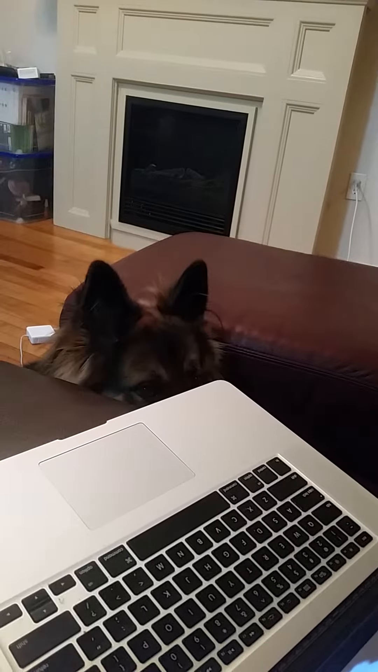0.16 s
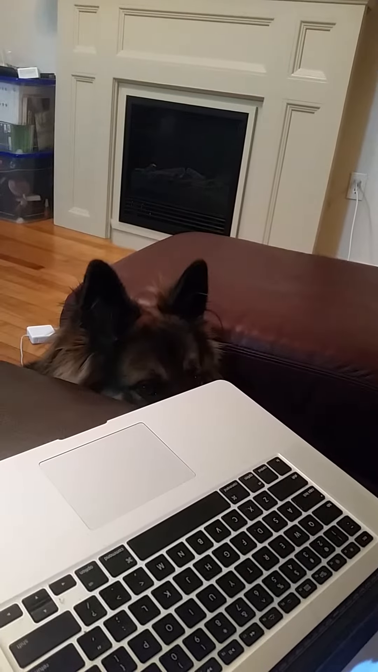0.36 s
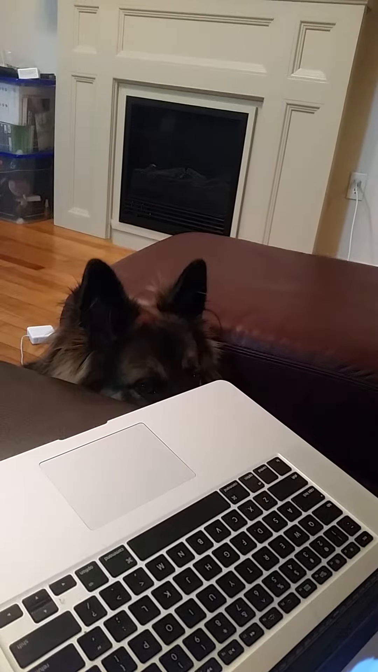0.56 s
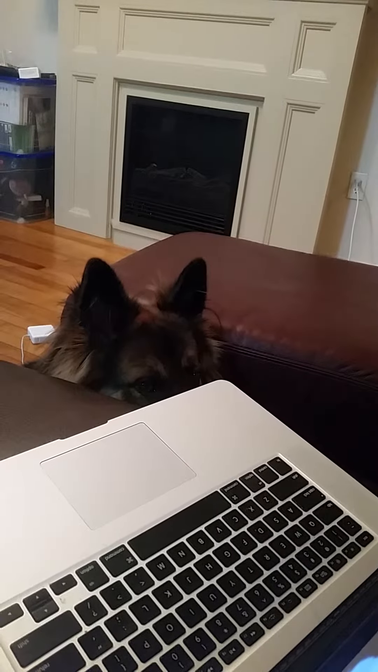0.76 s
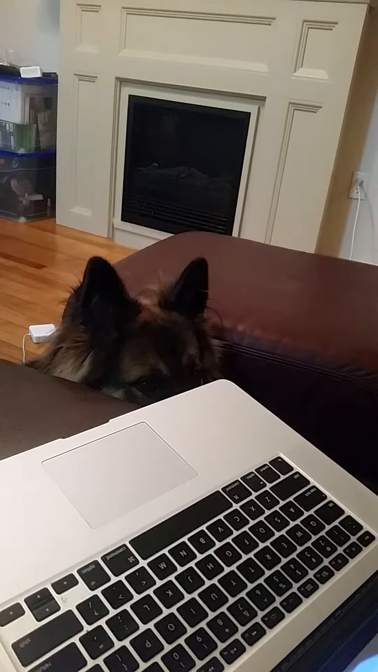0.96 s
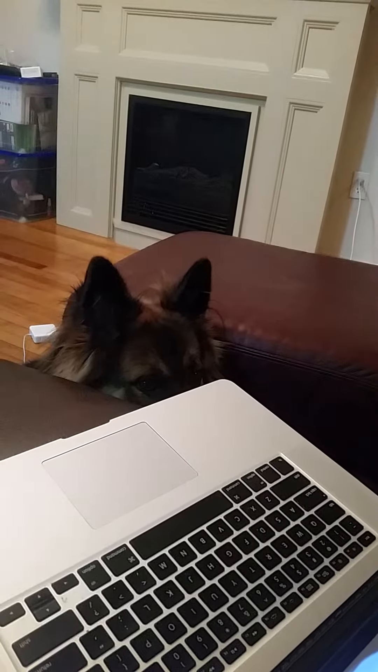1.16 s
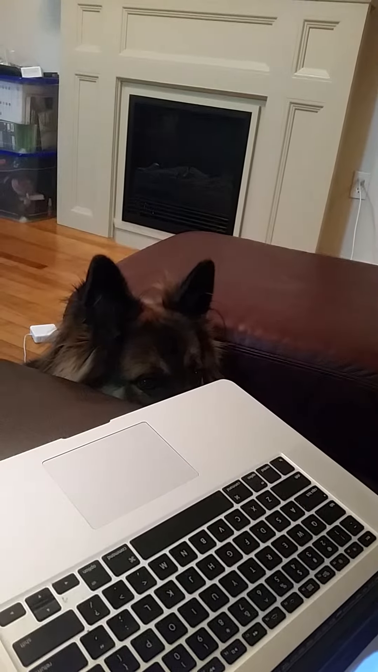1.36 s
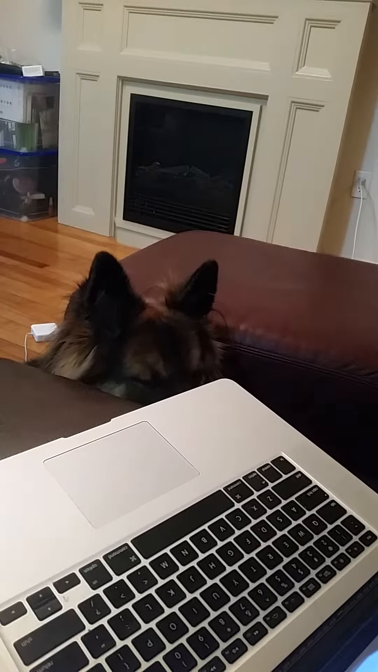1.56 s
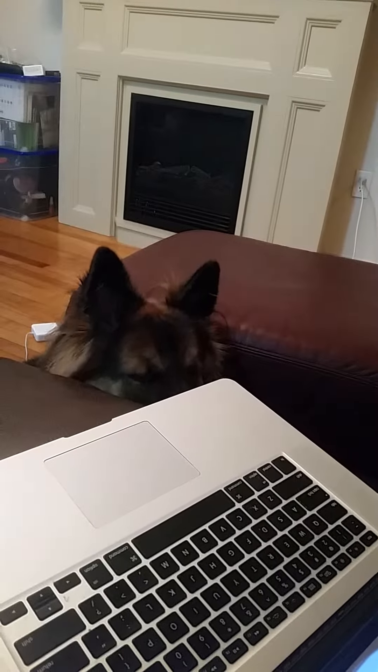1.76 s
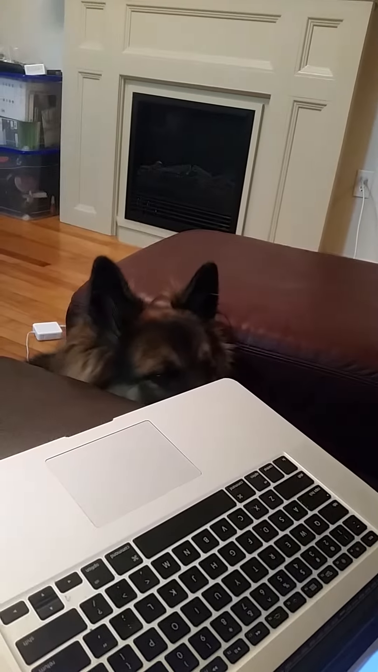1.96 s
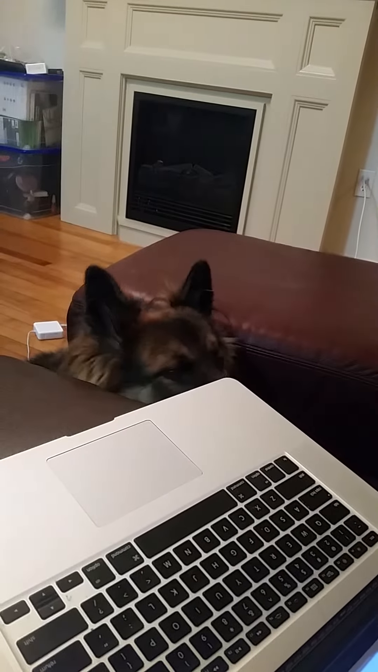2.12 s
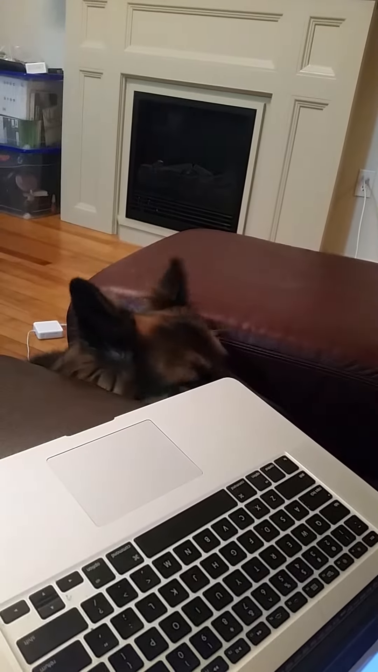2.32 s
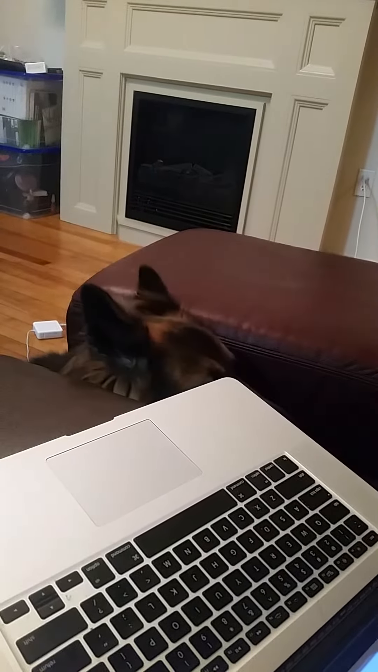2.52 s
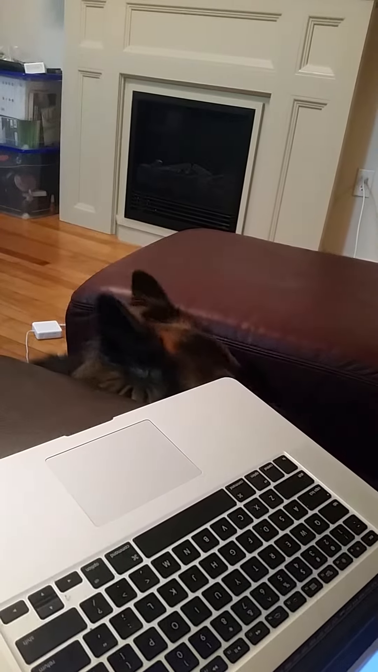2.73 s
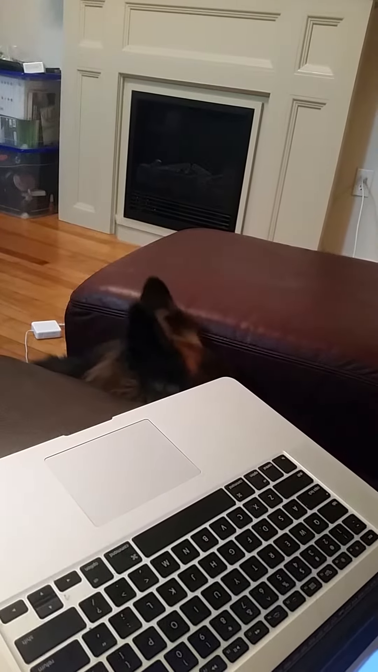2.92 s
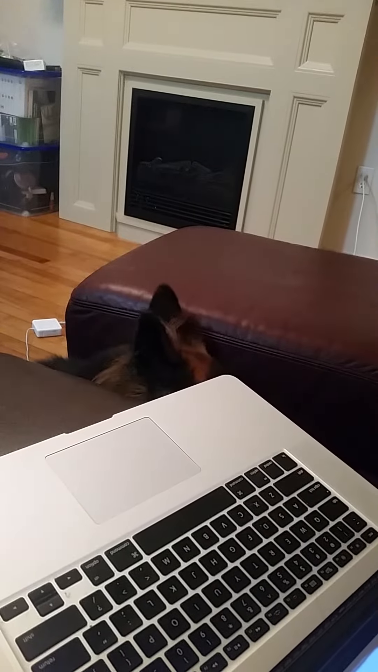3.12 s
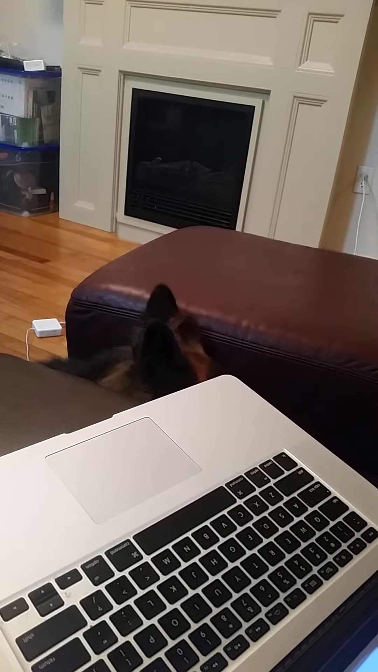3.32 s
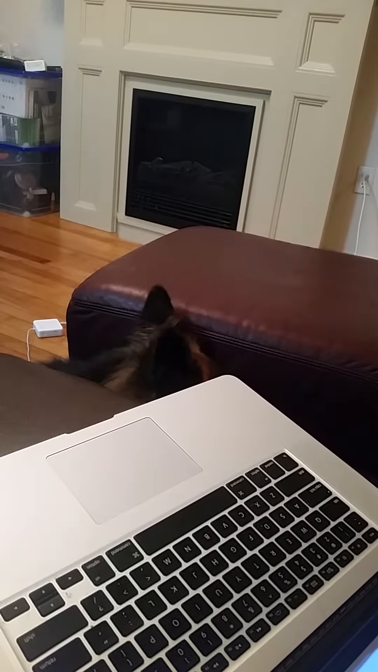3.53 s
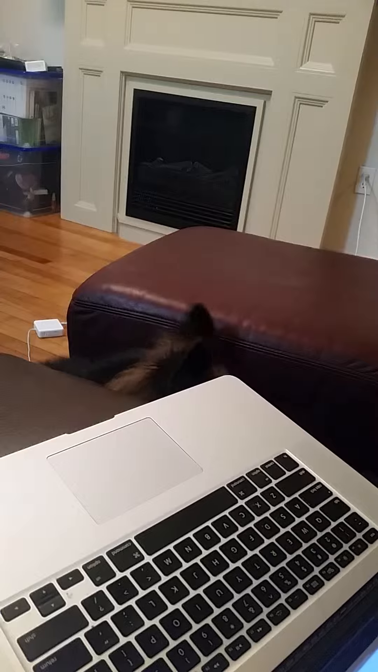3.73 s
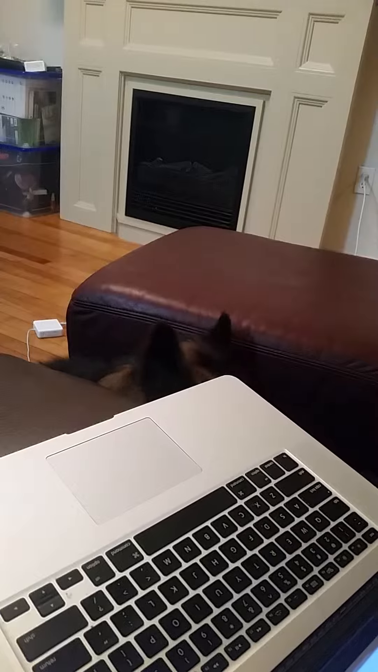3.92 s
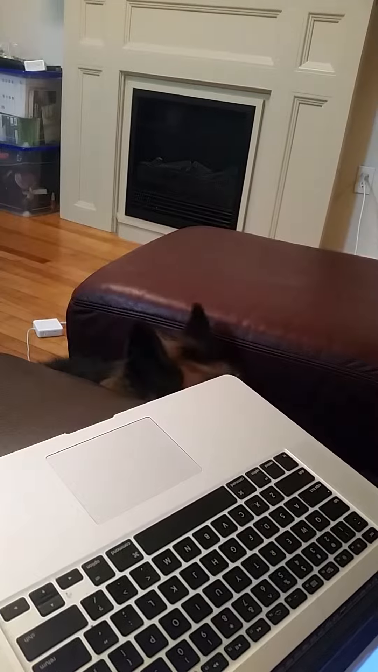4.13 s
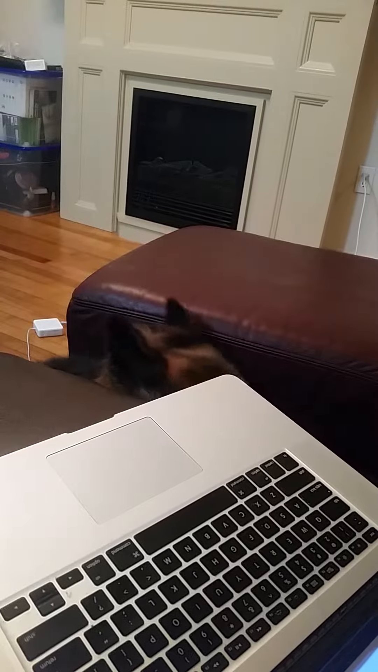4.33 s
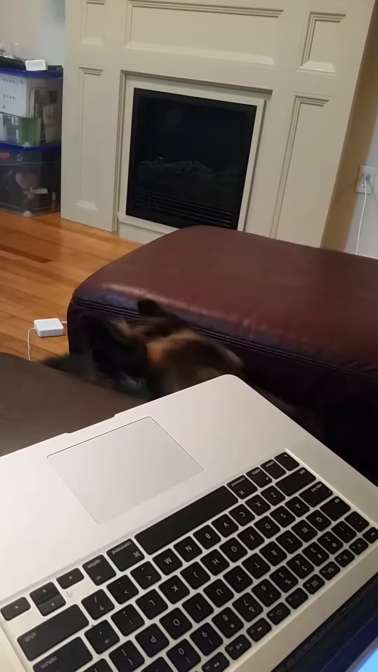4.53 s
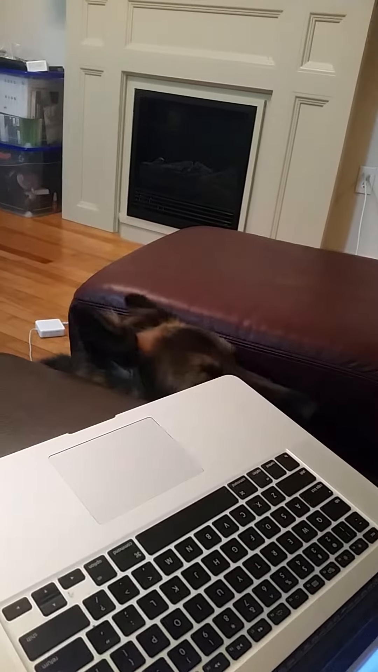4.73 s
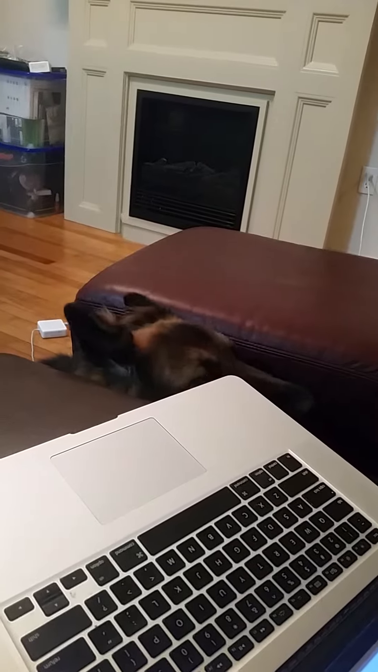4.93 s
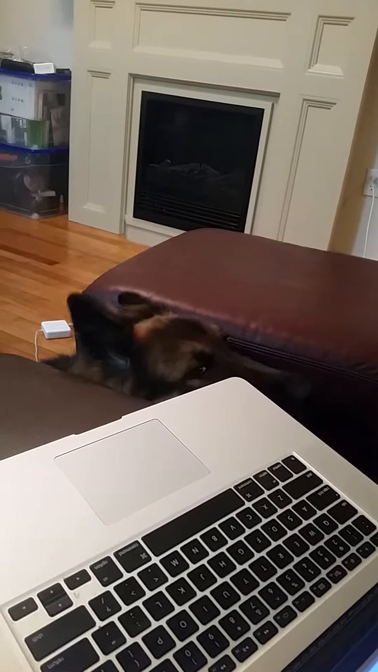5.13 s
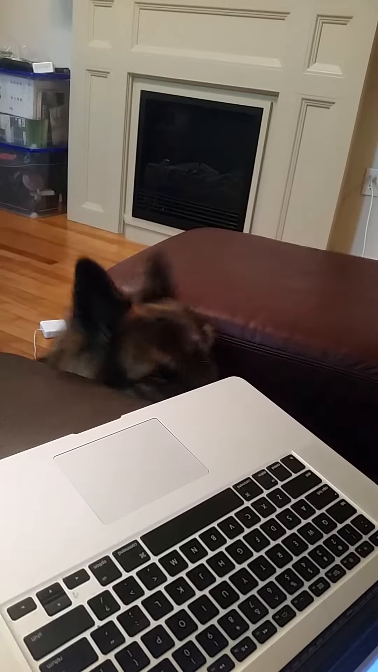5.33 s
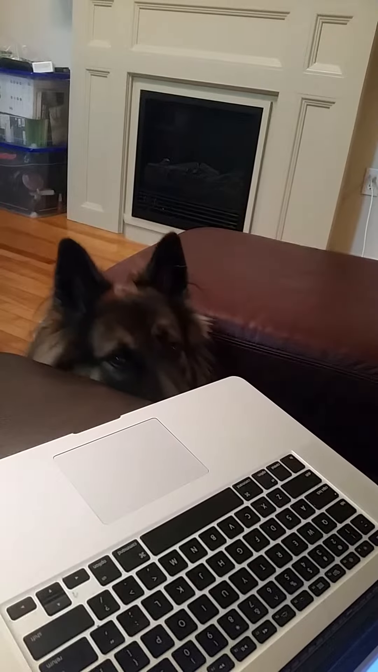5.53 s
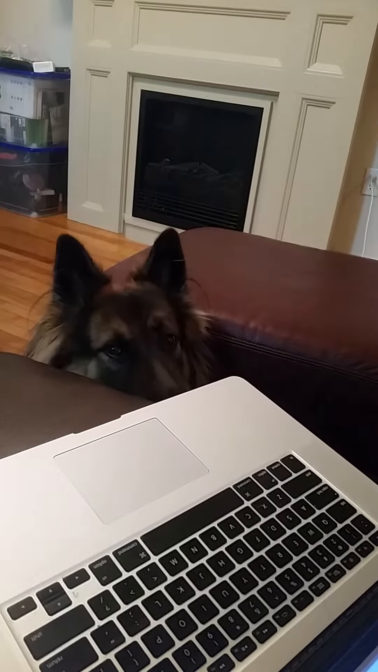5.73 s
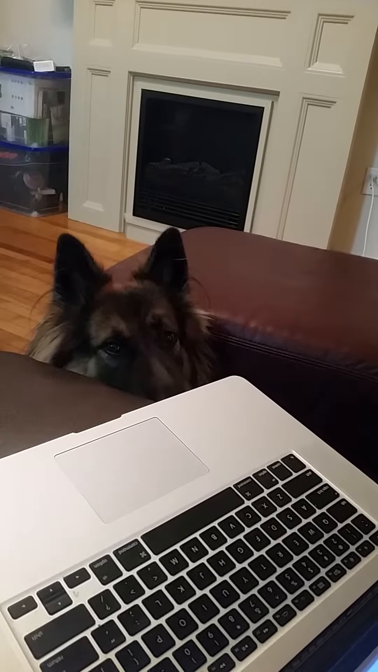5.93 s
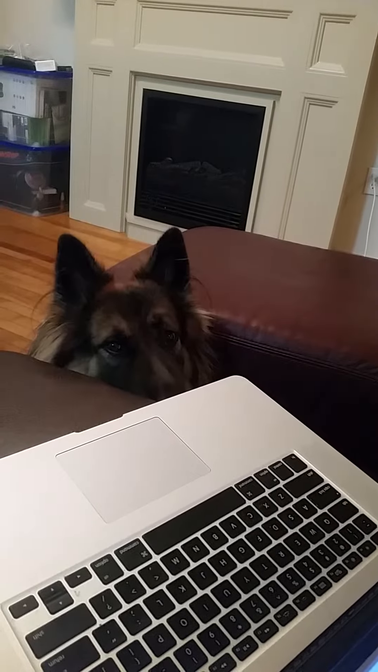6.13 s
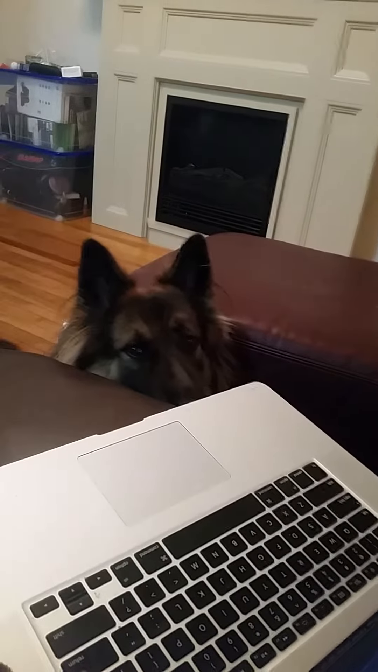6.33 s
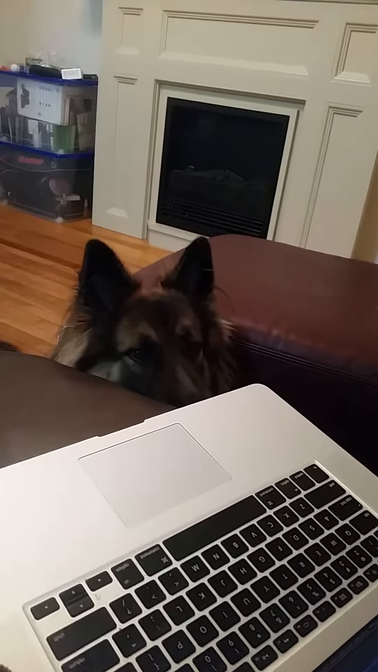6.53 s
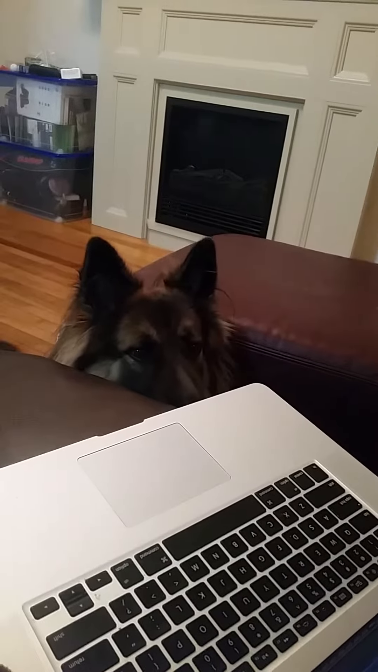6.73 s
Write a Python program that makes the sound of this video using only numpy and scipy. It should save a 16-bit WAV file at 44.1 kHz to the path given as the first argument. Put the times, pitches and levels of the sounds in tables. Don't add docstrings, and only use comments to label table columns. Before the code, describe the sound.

In a quiet furnished room, a large dog gives faint low moans and a thin nasal whine, then a loud howl that climbs quickly, holds, breaks and falls to a croak. A second, longer howl leaps up and sinks into a growl. Short soft whines follow. A hand-held microphone picks up thuds and ticks over faint room tone and hum; the dog sits to the right.

```python
import sys
import numpy as np
from scipy import signal
from scipy.fft import rfft, irfft, next_fast_len
from scipy.io import wavfile
from scipy.ndimage import uniform_filter1d, minimum_filter1d, map_coordinates

SR = 44100
rng = np.random.default_rng(int(sys.argv[2]) if len(sys.argv) > 2 else 0)


def wav_record(signal):
    frames = np.transpose(np.atleast_2d(signal))
    bounded = np.clip(frames, -1, 1)
    quanta = np.round(bounded * 32767).astype(np.int16)
    wavfile.write(sys.argv[1], SR, quanta)


def linear_from_db(decibels):
    return 10 ** (np.asarray(decibels, float) / 20)


N = 298468
T = np.arange(N) / SR
SLACK_HZ = 388.6

# (time [s], pitch [Hz], level [dB])
HOWL_1 = [
    [(1.56, 200, -51), (1.585, 211.1, -32.5), (1.645, 248.6, -45.5), (1.716, 366.6, -29.5),
     (1.79, 472.8, -31), (1.866, 624.4, -31.5), (1.94, 646, -32.5), (1.986, 661.6, -21.5)],
    [(2.02, 650.4, -21.5), (2.11, 647.8, -20), (2.3, 685.7, -13), (2.34, 661.8, -16), (2.4, 574.7, -16.5),
     (2.486, 478, -21), (2.54, 489.7, -19), (2.6, 494.5, -28.5)],
    [(2.71, 526.8, -20.5), (2.735, 535.9, -12), (2.81, 498, -10.5), (2.906, 464.5, -15),
     (2.95, 379.5, -26.5), (3.005, 273.5, -34.5), (3.1, 224.5, -33.5), (3.16, 136, -45),
     (3.27, 117.7, -57.5)],
]
HOWL_2 = [
    [(3.634, 335.2, -48), (3.672, 362, -40), (3.706, 361.6, -46), (3.72, 393, -44.5), (3.744, 371.6, -39.5),
     (3.77, 399.8, -45), (3.795, 440.8, -44)],
    [(3.82, 488.4, -53), (3.842, 520.9, -48.5), (3.864, 599.6, -41.5), (3.9, 731.8, -28),
     (3.93, 816, -19.5), (4.04, 748, -17), (4.09, 733.4, -12)],
    [(4.22, 687.9, -17.5), (4.3, 667.4, -14), (4.335, 635, -15.5), (4.38, 598, -16), (4.51, 582.1, -15.5),
     (4.59, 592.7, -14), (4.71, 530.7, -10), (4.73, 467.1, -8.5), (4.8, 460.7, -10.5)],
    [(4.88, 380.1, -16.5), (5.04, 350.6, -21.5), (5.1, 353.5, -18.5), (5.18, 422.5, -12),
     (5.24, 418.1, -23), (5.26, 380.2, -20), (5.345, 359.4, -24)],
    [(5.4, 255.2, -30), (5.45, 174.4, -35), (5.5, 119.8, -40.5), (5.56, 105, -42.5), (5.62, 90, -51.5)],
]


def howl(phrases, shapes, nose):
    # (time [s], rate [Hz], depth [0-1])
    flutter = [
        (2.58, 104.8, 0.01),
        (2.63, 116.2, 0.9),
        (2.71, 123.5, 0.7),
        (2.74, 120.7, 0.02),
    ]
    # (time [s], width [s], depth [0-1])
    dips = [(1.78, 0.013, 0.5), (2.019, 0.0098, 0.93), (2.169, 0.029, 0.5), (2.278, 0.018, 0.66),
            (2.458, 0.007, 0.9), (2.786, 0.0077, 0.96), (2.395, 0.0043, .7), (2.905, 0.0052, 0.6),
            (2.9, 0.01, 0.6), (4.8, .01, 0.3), (4.881, 0.0068, 0.4), (4.9, 0.013, 0.15),
            (3.9, 0.008, 0.8), (2.7, .006, 0.53), (2.835, .015, .4), (4.835, .008, .5), (4.9, .006, 0.4),
            (1.8, .005, .8), (4.7, 0.0069, .5), (4.371, 0.01, 0.3), (4.724, 0.0063, 0.75),
            (5.03, 0.022, 0.3)]
    # (frequency [Hz], level re overtone 5 [dB])
    mouth_tilt = [(1000, 3.5), (1900, -6), (2500, -19), (2900, -40.5), (3300, -72)]
    # (frequency [Hz], level per Hz [dB])
    mouth_breath = [(100, -14), (300, -1), (600, 3.5), (1400, -15.5), (2400, -12), (2800, -46.5),
                    (5000, -80)]
    # (frequency [Hz], level per Hz [dB])
    nose_breath = [(2400, -31), (3000, -12.5), (5000, 0), (7300, 1.5), (7900, -29.5), (10500, -32),
                   (12500, -13.5), (15500, -19)]
    slack_dull_db, flutter_upper = -17, 0.2
    faint_below_db, tail_hz = -34, 240

    rows = sum(phrases, [])
    hz, level_db = curves(rows)
    hz = uniform_filter1d(hz, size=500)
    jaw, mouth_db, muzzle_db, nose_db = curves(sum(shapes, []))
    low_db = overtones(hz, level_db, jaw, mouth_db, muzzle_db)
    nose_db = level_db + nose_db
    faint_db = np.clip(faint_below_db - level_db, 0, None) * (hz > tail_hz)
    phase, strength = folds(hz * (1 + .004 * wobble(12)), faint_db)
    on = gate(rows, fade=0.015)
    live = on > 0

    low = []
    for k, db in enumerate(low_db):
        unrest_db = min(2 * k + 1, 3) * wobble(16)
        low.append(linear_from_db(db + unrest_db) * np.sin((k + 1) * phase + k))
    main, voice = low[0], sum(low[1:])
    for s, width_s, deep in dips:
        main = main * (1 - deep * np.exp(-np.square((T - s) / width_s)))

    k = np.arange(6, 14)[:, None]
    top_db = low_db[-1] + slack_dull_db * np.clip(1 - hz / SLACK_HZ, 0, 1)
    upper_amp = linear_from_db(top_db[live] + along(mouth_tilt, k * hz[live]))
    voice[live] += np.sum(upper_amp * np.sin(k * phase[live] + k * k), axis=0)

    rate_hz, depth = curves(flutter)
    beat = depth * np.sin(2 * np.pi * np.cumsum(rate_hz) / SR)

    effort_db = uniform_filter1d(low_db[0], size=5000)
    breath = linear_from_db(0.38 * effort_db - 45.0 + 1.7 * wobble(8)) * noise(mouth_breath)
    breath *= 1 + .5 * np.sin(phase)
    sniff_db = uniform_filter1d(nose_db, size=4000) * 0.68 - 26.5
    breath += linear_from_db(sniff_db + 2.0 * wobble(12)) * noise(nose_breath)

    voiced = (main * (1 + 0.74 * beat) + voice * (1 + flutter_upper * beat)) * strength
    through_nose = linear_from_db(nose_db) * nasal(hz, phase, live, nose)
    return on * (voiced + rings(phase) + linear_from_db(-43.5) * beat + through_nose + breath)


def howls():
    # (time [s], jaw opening [0-1], mouth ring [dB], muzzle ring [dB],
    # nasal ring [dB]), rings re level
    shape_1 = [
        [(1.56, 0.0, -19, -1, -56), (1.7, 0.42, -20.5, -48, -60), (1.8, 0.6, -22, -60, -61),
         (1.9, 0.2, 4.5, -27, -41), (1.98, 0.87, -19, -37, -42)],
        [(2.03, 0.79, -16, -18.5, -42), (2.12, 0.81, -10, -14.5, -40.5), (2.22, 0.83, -27, -26.5, -40),
         (2.3, 0.63, -15, -27.5, -47.5), (2.35, 0.63, -5, -47.5, -44.5), (2.47, 0.33, -26.5, -45.5, -46.5),
         (2.55, 0.45, -19, -42.5, -50), (2.62, 0.45, 0.5, -31, -36.5), (2.67, 0.4, -4.5, -41, -39)],
        [(2.71, 0.4, -13.5, -52.5, -44), (2.76, 0.68, -16, -42.5, -48), (2.81, 0.69, -7.5, -23, -46),
         (2.9, 0.63, -7, -35.5, -42.5), (2.95, 0.39, -4, -18.5, -33.5), (3.02, 0.02, -20, -6, -42),
         (3.27, 0, -16, -8, -47)],
    ]
    shape_2 = [
        [(3.63, 0.25, -3.5, -38, -59), (3.67, 0.53, -7, -43, -59), (3.71, .4, -15.5, -44, -59),
         (3.73, .3, -6, -42.5, -59), (3.8, 0.5, -10.5, -46.5, -63.5), (3.93, 0.69, -5, -62, -58.5),
         (4.035, 0.63, -12.5, -64.5, -55), (4.05, 0.6, -11, -27, -56.5), (4.12, 0.6, -10, -26.5, -56.5)],
        [(4.22, 0.71, -13, -26.5, -46.5), (4.31, 0.71, -14.5, -38.5, -52.5), (4.39, 0.84, -26.5, -40, -46),
         (4.57, 0.8, -30, -58, -60.5), (4.62, 0.63, -27.5, -44.5, -55), (4.7, 0.63, -14.5, -60.5, -51.5),
         (4.74, 0.71, -20.5, -28, -40), (4.8, 0.6, -16, -30, -33.5)],
        [(4.87, 0.57, -19, -40, -45), (5.0, 0.28, -26, -32, -48.5), (5.12, 0.35, -19, -33, -52),
         (5.19, 0.63, -21.5, -33.5, -43.5), (5.24, 0.31, 2, -30, -39), (5.27, 0.12, -6, -14.5, -47),
         (5.35, 0.42, -9, -18, -43.5), (5.42, 0.11, -4, 10, -51), (5.62, 0, -20, -1, -54)],
    ]
    return howl(HOWL_1, shape_1, (1.9, 6560, 800, .14)) + howl(HOWL_2, shape_2, (3.9, 6220, 760, .5))


def folds(hz, faint_db=0):
    taut_rasp, slack_rasp, faint_rasp_per_db = .025, .33, .022
    rasp = taut_rasp + slack_rasp * np.clip(1 - hz / SLACK_HZ, 0, 1) + faint_rasp_per_db * faint_db
    jitter = .0012 * wobble(45) + .1 * rasp * wobble(90)
    phase = 2 * np.pi * np.cumsum(hz * (1 + jitter)) / SR
    return phase, np.sqrt(2) * (1 + 1.8 * rasp * wobble(140))


def overtones(hz, level_db, jaw, mouth_db, muzzle_db):
    jaw_shut_hz, jaw_octaves, jaw_width_hz, jaw_skirt_db = 498, 2.02, 277, -30.5
    muzzle_hz, muzzle_width_hz, skirt_top_hz = 2070, 564, 1510
    high = np.arange(2, 6)[:, None] * hz
    fourth = lambda u: np.square(np.square(u))
    skirt = linear_from_db(jaw_skirt_db) ** 2 / (1 + fourth(high / skirt_top_hz) ** 3)
    mouth_hz = jaw_shut_hz * 2 ** (jaw_octaves * jaw)
    mouth = 1 / (1 + fourth(2 * (high - mouth_hz) / jaw_width_hz)) + skirt
    muzzle = 1 / (1 + fourth(2 * (high - muzzle_hz) / muzzle_width_hz) ** 2)
    power = linear_from_db(mouth_db) ** 2 * mouth + linear_from_db(muzzle_db) ** 2 * muzzle
    return [level_db, *(level_db + 10 * np.log10(power))]


def nasal(hz, phase, live, nose):
    # (frequency [Hz], width [Hz], level [dB])
    side_peaks = [(4800, 600, -14), (5450, 500, -15)]
    settle_s, creep_hz_per_s, open_s = 0.54, 250, .06
    narrow_hz, wide_hz = 142, 650
    blur_hz, clear_hz, clearest = 445, 640, .98

    cry_s, rest_hz, start_hz, blur = nose
    since = np.clip(T - cry_s, 0, None)
    centre_hz = rest_hz + start_hz * np.exp(-since / settle_s) + creep_hz_per_s * since
    clear = clearest * np.clip((hz - blur_hz) / (clear_hz - blur_hz), 0, 1)
    width_hz = narrow_hz + (wide_hz - narrow_hz) * clear

    k = np.arange(5, 21)[:, None]
    high = k * hz[live]
    peak = lambda c, w: 1 / (1 + np.square(np.square(2 * (high - c) / w)))
    power = peak(centre_hz[live], width_hz[live]) + sum(linear_from_db(db) ** 2 * peak(c, w) for c, w, db in side_peaks)
    swell = linear_from_db(3 * np.array([wobble(12, T[live]) for _ in k]))
    blurred = phase[live] + blur * wobble(60, T[live])
    lines = np.zeros(N)
    lines[live] = np.sum(np.sqrt(power) * swell * np.sin(k * blurred + k * k), axis=0)
    lines = lines / np.sqrt(np.abs(uniform_filter1d(lines ** 2, size=8000)) + 1e-3)

    waver_hz = centre_hz + .25 * narrow_hz * wobble(25) + .7 * narrow_hz * wobble(400)
    hoarse = unit((1 + 0.65 * wobble(300)) * np.sin(2 * np.pi * np.cumsum(waver_hz) / SR))
    opened = np.clip(since / open_s, 0, 1)
    return opened * (clear * lines + np.sqrt(1 - clear ** 2) * hoarse * linear_from_db(1.0 * wobble(25)))


def rings(phase):
    # (time [s], length [s], overtone [multiple of pitch], level [dB])
    ring_list = [(1.205, .06, 3, -56), (1.205, .05, 4, -62), (1.69, .07, 3, -52), (1.96, .33, 11, -57),
                 (1.785, .035, 1.5, -45), (1.785, .035, 2.5, -43), (1.785, .04, 3, -47),
                 (1.785, .035, 4, -56), (1.79, .03, 5, -56), (1.83, .06, .5, -50), (1.815, .045, 2, -48),
                 (2.91, .07, 2, -33), (4.28, .05, 2, -36), (6.72, .05, 4, -72), (1.25, .19, 6, -68),
                 (1.32, .1, 8, -74), (1.88, .06, 5, -66), (1.95, .09, 5, -58), (2.02, .12, 5, -67),
                 (1.92, .3, 4, -64), (2.13, .22, 7, -62), (2.23, .09, 8, -62), (2.08, .14, 10, -63),
                 (2.1, .18, 12, -68), (2.345, .08, 4, -53), (2.5, .08, 5, -60), (2.56, .12, 4, -42),
                 (2.71, .07, 5, -53), (2.14, .06, 1.5, -50), (2.05, .15, .5, -50), (2.77, .1, 1.5, -48),
                 (4.1, .12, .5, -54), (3.93, .08, 4, -66), (3.93, .16, 6, -69), (4.06, .09, 4, -74),
                 (4.0, .2, 8, -72), (4.25, .14, 7, -68), (4.25, .09, 8, -69), (4.36, .1, 4, -57),
                 (4.6, .11, 8, -64), (4.68, .06, 5, -62), (5.19, .05, 6, -57), (6.26, .07, 9, -74),
                 (6.33, .08, 9, -75), (6.38, .08, 6, -66), (6.37, .08, 2, -55), (1.43, .16, 3, -62),
                 (5.36, .08, 3, -36), (5.36, .07, 5, -46)]
    out = np.zeros(N)
    blurred = phase + .12 * wobble(70)
    for s, life_s, k, db in ring_list:
        on = slice(round(s * SR), round((s + life_s) * SR))
        u = np.clip((T[on] - s) / life_s, 0, 1)
        out[on] += linear_from_db(db + 3.5) * np.sqrt(4 * u * (1 - u)) * np.sin(round(2 * k) / 2 * blurred[on])
    return out * linear_from_db(3 * wobble(30))


def whine(rows, tones_db):
    catch_db, catch_s = 12, .05
    hz, level_db, bright_db = curves(rows)
    faint_db = catch_db * np.exp(-np.abs(T - rows[0][0]) / catch_s)
    phase, strength = folds(uniform_filter1d(hz, size=250), faint_db)
    note = linear_from_db(level_db + 2.2 * wobble(14)) * np.sin(phase)
    for k, db in enumerate(tones_db, 2):
        note = note + linear_from_db(level_db + bright_db + db + 2.1 * wobble(14)) * np.sin(k * phase)
    return gate(rows, fade=0.004) * (strength * note + rings(phase))


def whines():
    # (time [s], pitch [Hz], level [dB], brightness [dB])
    whine_list = [
        [(1.209, 350, -49, 6.5), (1.235, 429, -42, -4), (1.262, 551, -49, -2.5), (1.3, 602, -51, -1),
         (1.41, 615, -46, -2), (1.49, 591, -46, -2), (1.585, 549.6, -49.5, 6.5), (1.62, 540, -43, -11)],
        [(6.045, 482, -47.5, 8), (6.075, 347, -49, 14), (6.095, 349, -52, 16.5), (6.12, 464, -47.5, 11),
         (6.155, 565, -51.5, -13), (6.24, 571, -46.5, -4), (6.34, 587.5, -46.5, -1), (6.39, 572, -53, 11.5),
         (6.45, 560, -52.5, 8)],
        [(6.632, 688, -44, -13), (6.64, 650, -34, -8), (6.648, 604, -40, -12), (6.66, 590, -47.5, -18),
         (6.672, 637, -46.5, 8), (6.696, 653, -50, -6), (6.712, 663, -48, -16), (6.77, 684, -43, -16)],
    ]
    # (overtone 2 re level [dB], overtone 3 re level [dB])
    whine_tones = [(-1, -10.5), (-13, -33), (-8.5, -39)]
    return sum(whine(rows, tones_db) for rows, tones_db in zip(whine_list, whine_tones))


def moans():
    # (time [s], length [s], pitch [Hz], level [dB], overtone 2 [dB])
    moan_list = [
        (-.02, 0.2, 264.2, -50, -7),
        (.22, 0.13, 242.8, -49.5, -3.5),
        (.36, 0.13, 215.6, -52, -21),
        (.55, 0.13, 220.7, -56, -22),
        (.8, 0.26, 225, -54, -7),
        (1.05, 0.13, 225, -51.5, -22),
    ]
    sag = 0.06
    hz, first, second = np.full(N, moan_list[0][2], float), np.zeros(N), np.zeros(N)
    for s, life_s, pitch_hz, db, second_db in moan_list:
        on = (T >= s) & (T < s + life_s)
        u = (T[on] - s) / life_s
        hz[on] = pitch_hz * (1 + sag * (.5 - u))
        first[on] = linear_from_db(db) * np.sqrt(np.abs(4 * u * (1 - u)))
        second[on] = first[on] * linear_from_db(second_db)
    phase, strength = folds(hz)
    return strength * (first * np.sin(phase) + second * np.sin(2 * phase))


def squeaks():
    # (time [s], length [s], pitch [Hz], level [dB])
    squeak_list = [(0.856, 0.066, 414, -48), (0.92, 0.13, 3960, -62), (6.62, 0.027, 10000, -65),
                   (3.396, 0.091, 2133, -65.5), (6.603, 0.027, 3720, -60), (6.712, 0.068, 3880, -56.5)]
    rise = 0.032
    drift, out = 1 + 0.00976 * wobble(10), np.zeros(N)
    for s, life_s, hz, db in squeak_list:
        u = np.clip(2 * (T - s) / life_s - 1, -1, 1)
        phase = 2 * np.pi * hz * np.cumsum(drift + rise * u / 2) / SR
        out = out + linear_from_db(db) * (1 - u ** 2) * np.sin(phase)
    return out


def croak():
    # (time [s], pitch [Hz], level [dB])
    croak_rows = [
        (3.135, 178, -62),
        (3.156, 181.6, -51),
        (3.2, 187.6, -52),
        (3.235, 188.6, -59),
        (3.275, 188, -68),
    ]
    # (frequency [Hz], level [dB])
    croak_tone = [(190, -4), (380, 2), (700, -8.5), (1100, 0.5), (1500, -19), (2250, -17.5), (2800, -17)]
    hz, level_db = curves(croak_rows)
    phase, strength = folds(hz)
    stack = np.zeros(N)
    for k in range(1, 15):
        stack += linear_from_db(along(croak_tone, k * hz) + 3 * wobble(30)) * np.sin(k * phase + k * k)
    return gate(croak_rows, fade=.01) * linear_from_db(level_db) * strength * stack


def puffs():
    # (time [s], length [s], level [dB])
    puff_list = [(.83, .07, -68), (1.49, .08, -73), (1.79, .14, -70), (2.33, .14, -63), (2.48, .1, -65),
                 (3.135, .05, -67), (3.22, .05, -68), (3.42, .09, -69)]
    # (frequency [Hz], level per Hz [dB])
    nostril = [(4500, -27), (5050, -9), (5250, -2), (5420, -12), (5800, -34.5)]
    swell = np.zeros(N)
    for s, life_s, db in puff_list:
        swell += linear_from_db(db) * np.clip(1 - (2 * (T - s) / life_s - 1) ** 2, 0, 1)
    return swell * noise(nostril)


def strays():
    # (time [s], length [s], from [Hz], to [Hz], level [dB])
    stray_list = [(2.34, .1, 330, 500, -44), (2.2, .1, 860, 960, -53), (1.2, .06, 2200, 2230, -72),
                  (3.39, .03, 350, 560, -49.5), (3.4, .06, 920, 930, -57.5)]
    out = np.zeros(N)
    for s, life_s, from_hz, to_hz, db in stray_list:
        u = np.clip((T - s) / life_s, 0, 1)
        phase = 2 * np.pi * np.cumsum(from_hz + (to_hz - from_hz) * u) / SR
        out = out + linear_from_db(db + 2.5) * np.sqrt(4 * u * (1 - u)) * np.sin(phase)
    return out


def room(x):
    # (frequency [Hz], t60 [s], level [dB])
    decay = [(151, 0.73, -1.5), (640, 0.39, -6.5), (1100, .4, 1.5), (2010, 0.5, 5), (7040, 0.11, -1)]
    out, hop = np.zeros((2, N + 2 * SR)), SR // 2
    for start in range(0, N, hop):
        hz, t, z = signal.stft(rng.standard_normal((2, SR // 2)), SR, nperseg=256)
        t60_s, level_db = (along([(r[0], r[c]) for r in decay], hz)[:, None] for c in (1, 2))
        tail = signal.istft(z * linear_from_db(level_db - 60 * t / t60_s) / np.sqrt(t60_s), SR, nperseg=256)[1]
        tail[0] = 0.3 * tail[1] + 0.85 * tail[0]
        piece = x[start:start + 2 * hop]
        piece = piece * np.hanning(2 * hop)[:len(piece)]
        wet = signal.fftconvolve(piece[None], tail / 56, axes=1)
        out[:, start + 200:start + 200 + wet.shape[1]] += wet
    return out[:, :N]


def dog_in_room():
    # (frequency [Hz], L-R [dB])
    dog_pan = [(60, -2.5), (150, -9.5), (380, -11), (950, -5), (2380, -7.5), (5980, -23.5), (15000, 9.5)]
    whine_dryer = .55
    no_bass = lambda hz: 1 / (1 + (75 / (hz + 1)) ** 6)
    shadow = lambda hz: linear_from_db([2.5 - 7 * hz ** 2 / (hz ** 2 + 900 ** 2), 0 * hz])
    voice, soft = howls(), whines()
    dog = voice + soft + moans() + squeaks() + croak() + puffs() + strays()
    dog = filtered(dog, no_bass)
    direct = filtered(dog * np.ones((2, 1)), shadow)
    return panned(linear_from_db(-0.5) * direct + linear_from_db(-1.5) * room(dog - whine_dryer * soft), dog_pan, lag=4.37)


def knocks(rows, rise_s, t60_s, colour):
    out, t = np.zeros((2, N + SR)), np.arange(SR // 2) / SR
    for s, db, pan_db in rows:
        puff = rng.standard_normal((2, len(t))) * linear_from_db(-60 * t / t60_s) * (1 - np.exp(-t / rise_s))
        start = round(s * SR)
        out[:, start:start + len(t)] += linear_from_db(db + np.array([[.5], [-.5]]) * pan_db) * puff
    return filtered(out[:, :N], colour)


def bumps():
    # (time [s], peak [dB], L-R [dB])
    bump_list = [(0.048, -51, -4), (0.45, -49, 10), (1.629, -39.5, 7), (4.459, -38, 6.5), (4.559, -33, 5.5),
                 (4.838, -40.5, 12.5), (4.999, -42, -0.5), (5.101, -34.5, 7.5), (5.179, -44, -0.5),
                 (6.288, -35, 3.5), (6.53, -49.5, 3)]

    def thud(hz):
        highpass = 1j * hz / (25 + 1j * hz) * 1j * hz / (22 + 1j * hz)
        return highpass / (1 + 1j * hz / 80) ** 2
    return linear_from_db(43.0) * knocks(bump_list, .02, 0.11, thud)


def ticks():
    # (time [s], peak [dB], L-R [dB])
    tick_list = [(0.829, -49.5, -14), (0.980, -44, -12.5), (1.015, -46.5, -10.5), (1.142, -43.5, -6),
                 (1.645, -50.5, -6.5), (1.92, -49.5, -5.5), (3.266, -40.5, -8.5), (6.6116, -52.5, -10.5)]
    # (frequency [Hz], level [dB])
    tick_tone = [(2000, -11), (6500, -7.5), (9500, -30), (12200, -26), (12800, -7.5), (13400, -21.5),
                 (15500, -17)]
    case = lambda hz: 1j * hz / (2500 + 1j * hz) * linear_from_db(along(tick_tone, hz))
    return linear_from_db(1.0) * knocks(tick_list, .002, 0.16, case)


def rustles():
    # (time [s], peak [dB], L-R [dB])
    rustle_list = [(3.4, -58, -8), (3.392, -59, -6), (6.045, -59, -5), (0.57, -58, 2), (3.13, -47.5, -6)]
    brush = lambda hz: 1j * hz / (400 + 1j * hz) / (1 + (hz / 2800) ** 4)
    return linear_from_db(11.0) * knocks(rustle_list, 0.01, 0.39, brush)


def air():
    # (frequency [Hz], level per Hz [dB])
    air_tone = [(20, -11.5), (90, -15.5), (160, -12.5), (234, -7), (400, -12), (650, -16), (1300, -20),
                (1500, -32), (2000, -38.5), (2650, -41), (3300, -37), (4000, -29.5), (4600, -36.5),
                (5250, -33), (5700, -56), (7500, -73)]
    # (frequency [Hz], left-right likeness [-1 to 1])
    air_alike = [(60, 0.69), (180, 0.59), (550, 0.7), (1650, -0.23), (4970, 0.078), (15000, -1.9)]
    # (frequency [Hz], L-R [dB])
    air_pan = [(60, -10), (180, -12.5), (550, -4.5), (1650, -4.5), (4970, 4.5), (15000, -15)]
    z = signal.stft(rng.standard_normal((2, N)), nperseg=512)[2]
    field = uniform_filter1d(rng.standard_normal(z.shape[1:]), size=5, axis=0)
    field = uniform_filter1d(field, size=12, axis=1)
    pair = signal.istft(z * linear_from_db(2.2 * unit(field)), nperseg=512)[1][:, :N]

    def mid_side(hz):
        turn = np.arccos(np.clip(along(air_alike, hz), -1, 1)) / 2
        return linear_from_db(along(air_tone, hz)) * [np.cos(turn), np.sin(turn)]
    mid, side = filtered(pair, mid_side)
    tone = unit(panned(np.array([mid + side, mid - side]), air_pan))
    treble = filtered(tone, lambda hz: 1 / (1 + (1600 / (hz + 1)) ** 4))
    treble_db = -64.5 + 0.11 * stir() + 1.8 * wobble(2.1)
    hum = linear_from_db(-56.0 + 0.41 * wobble(1.5)) * np.sin(2 * np.pi * 120.3 * T)
    return linear_from_db(-49) * (tone - treble) + linear_from_db(treble_db + 19.5) * treble + hum * linear_from_db([[-1], [1]])


def stir():
    quiet_db, above_db = -53, np.zeros(N)
    for phrases in (HOWL_1, HOWL_2):
        rows = sum(phrases, [])
        above_db += gate(rows, fade=.02) * np.clip(curves(rows)[1] - quiet_db, 0, None)
    return uniform_filter1d(above_db, size=8000)


def unit(x):
    return x / np.sqrt(np.mean(x ** 2) + 1e-20)


def along(points, hz):
    f, v = np.transpose(points)
    return np.interp(np.log(hz + 1), np.log(f + 1), v)


def curves(rows):
    s, *cols = np.transpose(rows)
    return [np.interp(T, s, c) for c in cols]


def wobble(rate_hz, t=T):
    knots, coarse = rng.standard_normal(int(N * rate_hz / SR) + 4), t[::16]
    smooth = map_coordinates(knots, [coarse * rate_hz], prefilter=False)
    return np.interp(t, coarse, smooth) * 1.44


def filtered(x, response):
    m = next_fast_len(N + SR // 2)
    return irfft(rfft(x, m) * response(np.fft.rfftfreq(m, 1 / SR)), m)[..., :N]


def noise(spectrum):
    return unit(filtered(rng.standard_normal(N), lambda hz: linear_from_db(along(spectrum, hz))))


def gate(rows, fade):
    return np.clip(np.minimum(T - rows[0][0], rows[-1][0] - T) / fade + .5, 0, 1)


def panned(pair, balance, lag=0):
    side = np.array([[.5], [-.5]])
    delay = lambda hz: np.exp(-2j * np.pi * hz * side * lag / SR)
    return filtered(pair, lambda hz: linear_from_db(side * along(balance, hz)) * delay(hz))


def scene():
    return dog_in_room() + air() + bumps() + ticks() + rustles()


def low_pass(x):
    return signal.sosfilt(signal.butter(12, 16420, fs=SR, output="sos"), x)


def record(dry):
    # (frequency [Hz], level per Hz [dB])
    hiss_tone = [(5000, -29.5), (6500, -17.5), (9500, -16), (11000, -7.5), (14000, -2), (15700, -0.5)]
    top_hz = 15760
    hiss = unit(filtered(rng.standard_normal((2, N)), lambda hz: linear_from_db(along(hiss_tone, hz))))
    hiss_db = -75.0 + .16 * stir() + 1.5 * wobble(3.3)
    x = filtered(dry + linear_from_db(hiss_db) * hiss, lambda hz: hz < top_hz) - .0005
    needed = np.minimum(1, .92 / np.abs(x).max(axis=0))
    gain = uniform_filter1d(minimum_filter1d(needed, size=1600), size=800)
    return low_pass(x * gain)


dry = scene()
out = record(dry)
wav_record(out)
```